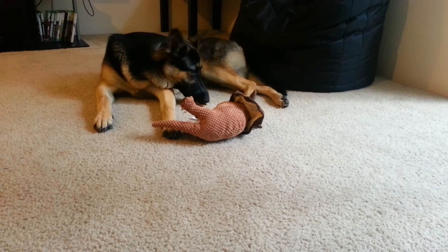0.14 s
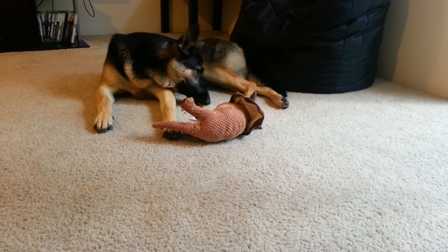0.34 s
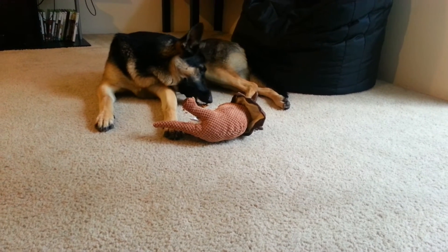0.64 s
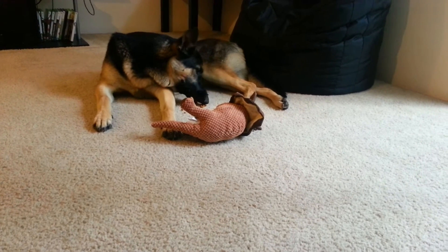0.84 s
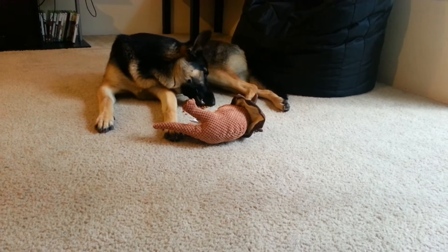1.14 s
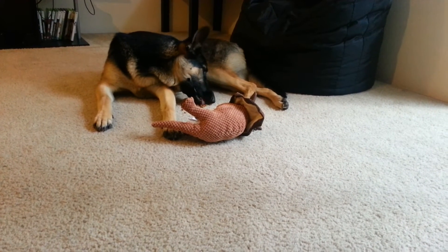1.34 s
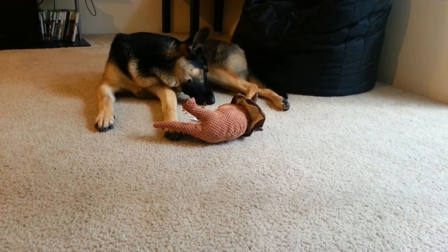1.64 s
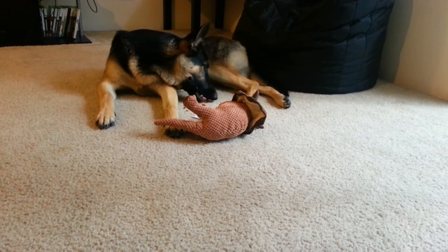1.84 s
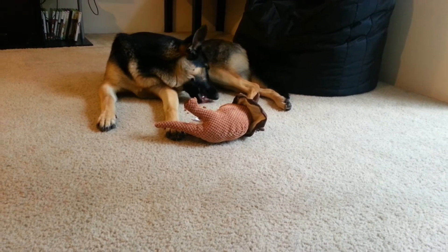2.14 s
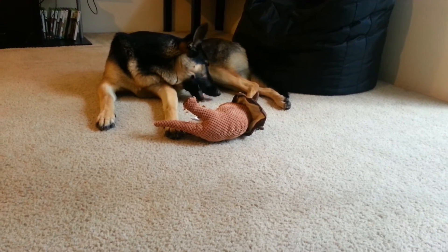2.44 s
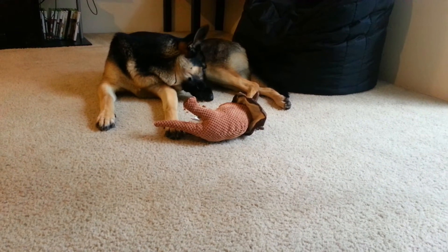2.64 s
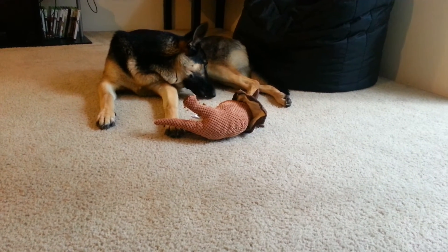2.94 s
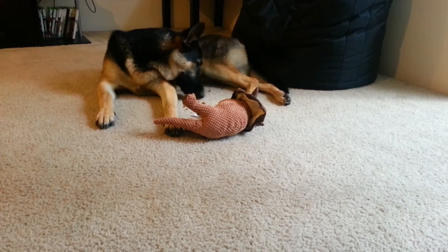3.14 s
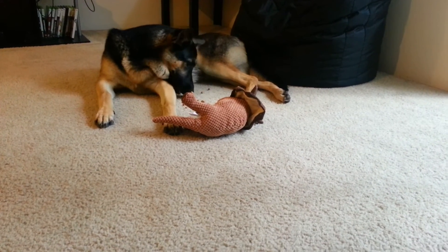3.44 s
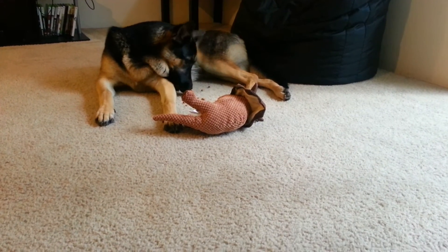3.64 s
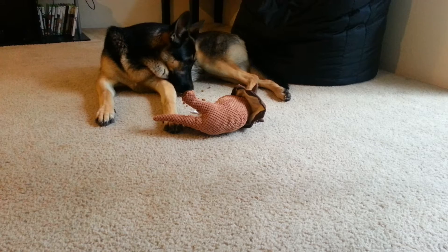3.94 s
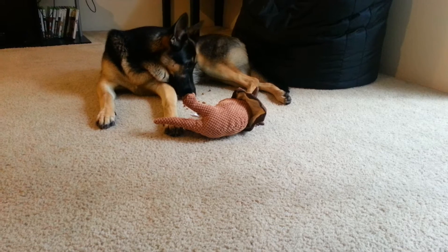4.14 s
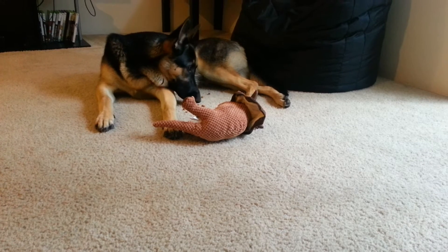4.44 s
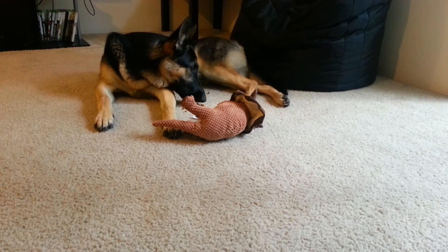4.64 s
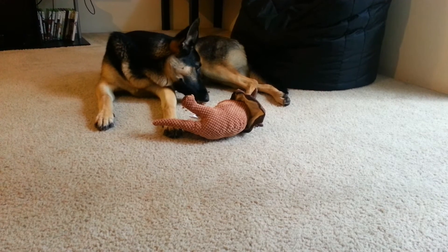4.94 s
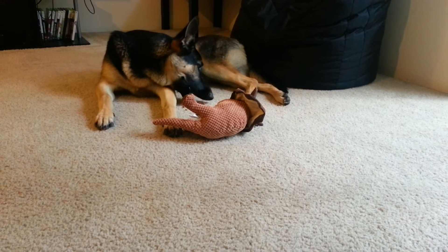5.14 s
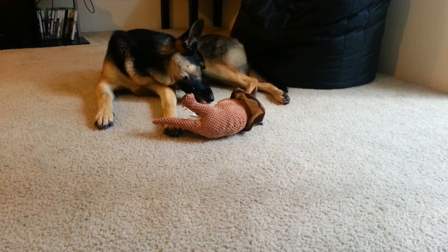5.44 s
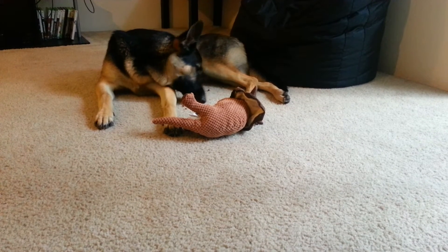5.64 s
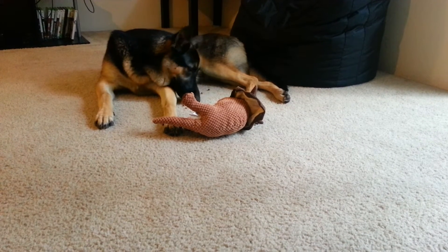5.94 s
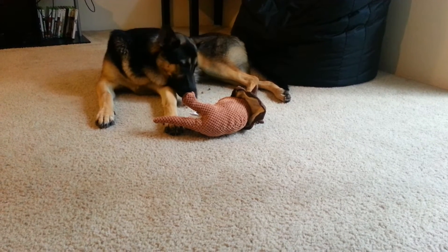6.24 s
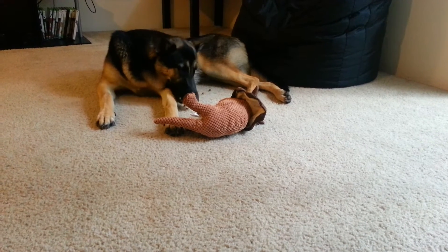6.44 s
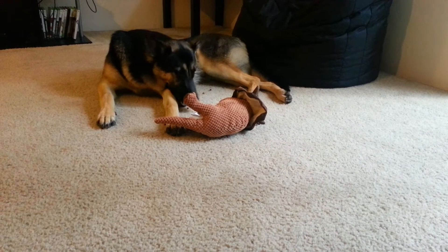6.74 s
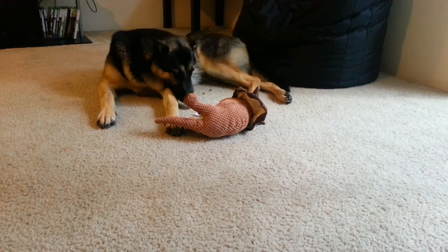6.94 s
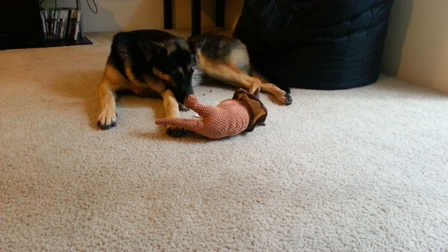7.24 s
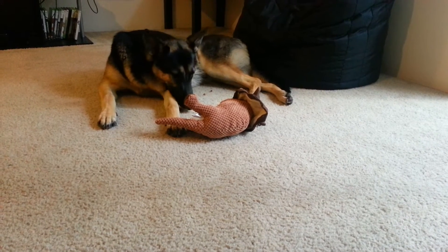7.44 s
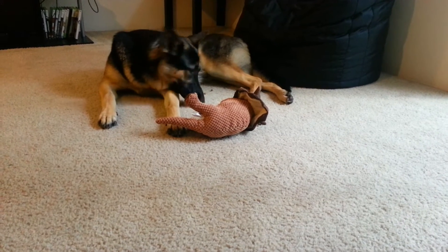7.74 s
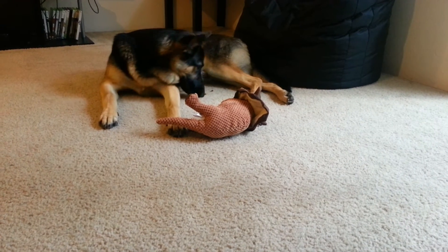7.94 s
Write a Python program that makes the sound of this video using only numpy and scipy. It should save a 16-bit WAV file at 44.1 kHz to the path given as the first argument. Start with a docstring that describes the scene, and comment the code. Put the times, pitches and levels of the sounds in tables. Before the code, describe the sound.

Bright, brittle crunching from a chewing dog bursts loudest around two seconds, then thins to scattered clicks and soft knocks as the room hum drops.

```python
"""In a carpeted room, a dog gnaws something dry and brittle: sharp cracks over dense crackle, and soft knocks.
Cracks are ringing noise snaps; the crackle is thousands of tiny ringing bursts over rubbing noise.
A low machine hum and rumble, made of filtered noise, fill the room and fade after five seconds.
A noise suppressor lets the background hiss swell when the gnawing is loud enough.
A faint thin sine whine sits near 10 kHz in the first half."""
import sys
import numpy as np
from scipy import signal
from scipy.fft import rfft, irfft, next_fast_len
from scipy.io import wavfile
from scipy.ndimage import uniform_filter1d

SR = 44100
rng = np.random.default_rng(int(sys.argv[2]) if len(sys.argv) > 2 else 0)


def waveform_to_disk(signal):
    """Save audio, clipped to [-1, 1], as 16-bit WAV at the path in sys.argv[1]."""
    frames = np.transpose(np.atleast_2d(signal))
    scaled = np.clip(frames, -1, 1) * 32767
    samples = np.round(scaled).astype(np.int16)
    wavfile.write(sys.argv[1], SR, samples)


def boost_factor(decibels):
    """Convert a level in decibels to a linear amplitude factor."""
    exponent = np.asarray(decibels, float) / 20
    return 10 ** exponent


N = 356460   # length in samples


def in_time(rows):
    """Turn table columns into curves with one value per sample, by straight lines between rows."""
    seconds, *columns = np.transpose(rows)
    return [np.interp(np.arange(N) / SR, seconds, column) for column in columns]


def at_hz(points, hz):
    """Read a frequency table at any frequency, by straight lines on a log frequency axis."""
    table_hz, values = np.transpose(points)
    return np.interp(np.log(hz), np.log(table_hz), values)


def rms_one(x):
    """Scale to an rms (average strength) of 1."""
    return x / np.sqrt(np.mean(x ** 2) + 1e-20)


def resonance(x, hz, width_hz):
    """Ring at one pitch: a two-pole filter with a gain of about 1 at its top."""
    r = np.exp(-np.pi * width_hz / SR)
    feedback = [1, -2 * r * np.cos(2 * np.pi * hz / SR), r * r]
    return signal.lfilter([(1 - r * r) / 2, 0, (r * r - 1) / 2], feedback, x)


def flicker(rate_hz=11.0):
    """Slow random wander with a spread of 1: white noise smoothed twice."""
    r = np.exp(-2 * np.pi * rate_hz / SR)
    wander = signal.lfilter([1], [1, -2 * r, r * r], rng.standard_normal(N + SR))
    return rms_one(wander[SR:])   # leave out the first second, while the filter settles


# How alike the two microphones hear. Each row: frequency in Hz, likeness (1 = the same, 0 = unrelated).
ALIKENESS = [(60, .85), (200, 0.72), (630, 0.77), (1400, 0.22), (3000, 0.32), (6700, 0.05)]
# How sound leans to one side. Each row: frequency in Hz, left level minus right level in dB.
SIDE_LEAN = [(60, 0), (300, 3.5), (1300, 3.5), (2400, 2.16), (4300, 3.5), (8000, -7), (14000, 5)]


def coloured(mid_side, spectrum):
    """Colour a shared and a side noise by a spectrum and spread them over two microphones; rms 1."""
    size = next_fast_len(N)
    hz = np.maximum(np.arange(size // 2 + 1) * SR / size, 1)
    alike = np.clip(at_hz(ALIKENESS, hz), -1, 1)
    mid, side = rfft(mid_side, size) * boost_factor(at_hz(spectrum, hz))
    pair = np.sqrt(1 + alike) * mid + np.sqrt(1 - alike) * side * [[1], [-1]]
    lean = boost_factor(at_hz(SIDE_LEAN, hz) / 2 * [[1], [-1]])
    return rms_one(irfft(pair * lean, size)[:, :N])


# Single sharp cracks. Each row: start in seconds, peak of the left-right average in dB before the
# treble is cut, pitch in Hz.
CRACK_EVENTS = [(0.4446, -22.5, 5760), (0.48, -37, 2830), (0.599, -21, 7810), (0.6082, -22, 6240),
                (0.7065, -26, 7100), (0.7231, -15.5, 7210), (0.7384, -24.5, 7000), (0.7565, -21, 7050),
                (0.7707, -13.5, 4440), (0.7956, -13, 6800), (0.828, -25, 6700), (0.8994, -41, 2160),
                (0.9855, -40, 6900), (1.545, -19, 6900), (1.7759, -31, 8500), (1.8115, -17.5, 7160),
                (1.8897, -17, 5950), (1.897, -12.5, 4470), (1.9895, -7, 6980), (2.0045, -10.5, 4856),
                (2.0127, -9.5, 7170), (2.0274, -5.5, 6910), (2.045, -9, 6820), (2.0646, -7, 7080),
                (2.07, -9, 7400), (2.0771, -6, 7040), (2.1156, -7.5, 7005), (2.149, -4, 5420),
                (2.173, -12, 6800), (2.228, -19, 4860), (2.2635, -18, 4396), (2.2794, -21, 6570),
                (2.2987, -23, 6860), (2.3044, -17, 6640), (2.3218, -19, 6200), (2.375, -25, 7300),
                (2.395, -33.5, 3490), (2.4144, -21.5, 7020), (2.4513, -16, 4500), (2.4635, -21.5, 4830),
                (2.48, -25, 6940), (2.5024, -20, 6700), (2.5235, -19.5, 7280), (2.5456, -23.5, 7300),
                (2.5597, -14.5, 7010), (2.59, -18.5, 6480), (2.5955, -21.5, 5400), (2.628, -24.5, 6700),
                (2.831, -23, 6470), (3.0931, -27.5, 7340), (3.2094, -37.5, 6240), (3.801, -34, 7830),
                (3.9499, -32, 7250), (5.0858, -44.5, 6850), (5.3023, -34, 6000), (5.322, -41, 5800),
                (5.345, -40, 5900), (5.3716, -40, 5590), (5.389, -40, 5380), (5.6456, -43.5, 7250),
                (5.9333, -33, 7140), (6.0784, -35, 6600), (6.238, -46, 6800), (6.5936, -29.5, 6530),
                (6.7366, -36, 3770), (6.794, -44, 7000), (6.8584, -24, 3840), (7.2658, -33.5, 4880),
                (8.0651, -32, 6960)]


def cracks(rise_s=.0003, snap_s=.00057, tail_s=.006, tail_db=-20, q=4.0, port_hz=7100, body_db=-15.5):
    """A snap and short tail of noise, ringing at its own pitch and at the microphone ports."""
    size = 2048
    out, t = np.zeros((2, N + size)), np.arange(size) / SR
    decay = np.exp(-t / snap_s) + boost_factor(tail_db) * np.exp(-t / tail_s)
    shape = (1 - np.exp(-t / rise_s)) * decay
    port_gain = boost_factor([[-14.0], [-1.5]])   # left, right
    body_band = signal.butter(3, [1100, 5000], "band", fs=SR, output="sos")
    draws = rng.standard_normal((len(CRACK_EVENTS), 3, size))
    for (s, db, hz), noise in zip(CRACK_EVENTS, draws):
        burst = shape * noise[1:]   # treble reaches the two microphones unalike
        body = signal.sosfilt(body_band, shape * (noise[0] + 0.23 * noise[1:]))   # mostly shared
        lean = boost_factor(at_hz(SIDE_LEAN, hz) / 2 * np.array([[1], [-1]]))
        own = resonance(burst, hz, hz / q) * lean
        port = port_gain * resonance(burst, port_hz, 600) * (hz / port_hz)
        ring = own + port + boost_factor(body_db) * body
        i = round(s * SR)
        out[:, i:i + size] += boost_factor(db) * ring / np.abs(ring.mean(axis=0)).max()
    treble_cut = signal.butter(4, 11500, fs=SR, output="sos")
    return signal.sosfilt(treble_cut, out[:, :N])


# Long chews, one list each. Each row: time in seconds, crackle level in dB.
LONG_CHEWS = [
    [(0.7, -48), (0.79, -33), (0.84, -44), (0.88, -65.5)],
    [(1.765, -73), (1.803, -35), (2.065, -19), (2.143, -35), (2.157, -29), (2.21, -41), (2.298, -42),
     (2.44, -60), (2.455, -47), (2.6, -44), (2.72, -59)],
    [(5.15, -74), (5.162, -60), (5.216, -57.5), (5.28, -63), (5.33, -55), (5.398, -57), (5.43, -75.5)],
]
# Short bites. Each row: start in seconds, crackle peak in dB, time in seconds to fade by 20 dB.
SHORT_BITES = [(0.005, -46, .04), (.32, -62, .15), (.444, -52, .1), (.599, -39, .09), (.934, -60, .3),
               (1.546, -51, .1), (2.832, -56, .08), (3.092, -50, .06), (3.21, -62, .1), (2.94, -63, .1),
               (3.59, -64, .1), (3.802, -54, .055), (4.02, -63, .06), (3.954, -57, .07), (4.288, -61, .1),
               (5.084, -62, .04), (5.6, -58, .14), (5.932, -58, .09), (6.078, -63, .1), (6.17, -63, .1),
               (6.23, -64, .05), (6.356, -60, .06), (6.522, -59, .07), (6.591, -51.5, .07), (6.72, -58, .1),
               (6.74, -51, .11), (6.856, -45, .05), (6.975, -59, .06), (7.268, -45, .055), (7.64, -58, .06),
               (8.03, -63, .1), (8.065, -55, .04)]


def chews(rise_db_per_s=2800, longest_s=.13):
    """Loudness of the crackle: long chews follow their rows, bites jump up and fade evenly."""
    t, db = np.arange(N) / SR, np.full(N, -120.)   # as good as silent in between
    for rows in LONG_CHEWS:
        db = np.maximum(db, np.interp(t, *np.transpose(rows), left=-120, right=-120))
    for s, peak_db, fade_s in SHORT_BITES:
        near = slice(max(round((s - .1) * SR), 0), round((s + longest_s) * SR))
        late = t[near] - s
        bite_db = peak_db + np.minimum(rise_db_per_s * late, -20 * late / fade_s)
        db[near] = np.maximum(db[near], bite_db)
    return uniform_filter1d(boost_factor(db), size=200)


# Colour of the crackle. Each row: frequency in Hz, relative level in dB per Hz.
CRACKLE_COLOUR = [(500, -45.5), (900, -23), (1310, -7), (1680, -23), (2360, -7.5), (2990, -15),
                  (4460, -3.5), (6060, -4.5), (7100, 0.5), (7940, -9), (11400, -17.5), (12600, -25.5),
                  (14500, -40.5)]


def crackle(per_s=2000, spread_db=3.2, burst_s=.0008, q=3.0, rub=.8):
    """Tiny fractures at random: noise bursts, each ringing at one of eight pitches, over rubbing noise."""
    hits = rng.random(N) < per_s / SR
    sizes = boost_factor(spread_db * np.minimum(rng.exponential(1, N), 4)) * hits
    r = np.exp(-1 / (burst_s * SR))
    dealt = rng.integers(0, 8, N)   # which pitch each fracture gets
    noise = rng.standard_normal((2, N))
    grains = 0
    for k, hz in enumerate(np.geomspace(1200, 12000, 8)):
        envelope = signal.lfilter([1], [1, -r], sizes * (dealt == k) + 1e-18)
        grains = grains + resonance(envelope * noise, hz, hz / q)
    rubbing = rub * rng.standard_normal((2, N))
    return chews() * coloured(rms_one(grains) + rubbing, CRACKLE_COLOUR)


# Dull knocks. Each row: start in seconds, peak in dB before the lean to the left, pitch in Hz.
KNOCK_EVENTS = [(.71, -40.5, 706), (1.93, -40.5, 397), (2.64, -36.5, 443), (5.59, -53, 644),
                (6.17, -47.5, 400), (6.6, -53, 600), (7.38, -57, 400)]


def knocks(cycles=5.5, q=1.3):
    """Soft swells of low noise, some cycles long, through two broad resonances at the same pitch."""
    size = 8192
    out, t = np.zeros(N + size), np.arange(size) / SR
    draws = rng.standard_normal((len(KNOCK_EVENTS), size))
    for (s, db, hz), noise in zip(KNOCK_EVENTS, draws):
        rung = resonance(resonance(noise, hz, hz / q), hz, hz / q)
        thud = rung * t * np.exp(-t * hz / cycles)
        i = round(s * SR)
        out[i:i + size] += boost_factor(db) * thud / np.abs(thud).max()
    return out[:N] * boost_factor([[1.3], [-1.3]])   # left up, right down, in dB


def whine(hz=10010, peak_db=-78.5, end_s=4.07):
    """A steady faint sine tone that stops with a 28 ms fade."""
    t = np.arange(N) / SR
    return boost_factor(peak_db) * np.sin(2 * np.pi * hz * t) * np.clip((end_s - t) / 0.028, 0, 1)


# How far the hiss is held down between chews. Each row: time in seconds, level in dB before hiss() raises it.
SHUT_LEVEL = [(0.0, -76), (0.9, -74), (2.77, -75), (6.93, -84), (8.08, -82)]


def suppressor(sound, open_db=-69, threshold_db=-66, knee_db=8.0, hold_s=.019):
    """Noise suppressor: opens while the dog is loud; returns the shut level and the rise on opening, in dB."""
    width = round(hold_s * SR)
    power = uniform_filter1d((sound ** 2).mean(axis=0), width, origin=width // 3)
    opening = np.clip((10 * np.log10(power + 1e-12) - threshold_db) / knee_db, 0, 1)
    shut_db = in_time(SHUT_LEVEL)[0]
    return shut_db, opening * (open_db - shut_db)   # held down deeper, it jumps more


# Colour of the hiss. Each row: frequency in Hz, relative level in dB per Hz.
HISS_COLOUR = [(410, -23), (700, -9), (2670, -16), (6160, -15), (7180, -11.5), (8500, -19), (13800, -20),
               (14400, -17), (14800, -44)]


def hiss(shut_db, open_by_db, raise_db=12.5, flicker_db=1.5):
    """Coloured noise whose level follows the suppressor and flickers at random."""
    level_db = shut_db + raise_db + open_by_db + flicker_db * flicker()
    return boost_factor(level_db) * coloured(rng.standard_normal((2, N)), HISS_COLOUR)


# Brief swells of the low background. Each row: middle in seconds, rise of the deep hum in dB.
SWELL_EVENTS = [(5.75, 14), (6.34, 8), (6.46, 9), (6.61, 12), (6.77, 6), (6.88, 11), (7.23, 13), (7.3, 10),
                (7.39, 6), (7.55, 6), (7.97, 8)]


def swells(width_s=.04):
    """Bell-shaped rises in dB."""
    t = np.arange(N) / SR
    return sum(db * np.exp(-((t - s) / width_s) ** 2) for s, db in SWELL_EVENTS)


# Base levels of the lows, before swells and wavering. Each row: time in seconds, rumble setting in dB
# (rumble() halves its broad part), deep hum in dB.
LOW_LEVELS = [(0.0, -48, -57), (0.38, -43, -57), (0.76, -43, -60), (1.0, -45, -53), (1.6, -42.5, -56),
              (2.0, -41.5, -57), (2.9, -42.5, -54), (3.6, -44.5, -55), (4.35, -46, -55), (4.46, -57, -66),
              (4.6, -47, -51), (4.86, -51.5, -56), (5.06, -57, -67), (5.26, -55, -66), (5.55, -62, -68),
              (7.13, -62, -71), (7.6, -61, -69), (8.08, -56, -66)]


def low_levels(open_by_db, rumble_share=.35, deep_share=.3, lag_s=.04):
    """Rumble and deep hum levels in dB: they swell, waver, and follow the suppressor slowly and in part."""
    slow_db = uniform_filter1d(open_by_db, round(lag_s * SR))
    swell_db = swells()
    rumble_db, deep_db = in_time(LOW_LEVELS)
    rumble_db = rumble_db + rumble_share * slow_db + .5 * swell_db + 1.4 * flicker(rate_hz=7.0)
    deep_db = deep_db + deep_share * slow_db + swell_db + 2.5 * flicker(rate_hz=5.0)
    return rumble_db, deep_db


# Colour of the broad rumble. Each row: frequency in Hz, relative level in dB per Hz.
RUMBLE_COLOUR = [(15, -56.5), (25, -22), (71, -12.5), (102, -18), (155, -6.5), (209, -12.5), (270, -6),
                 (326, -13), (1380, -25), (2350, -37.5), (4000, -44.5), (5200, -72.5), (8800, -120)]
# Room resonances the hum excites. Each row: pitch in Hz, width in Hz of each of two passes, relative level in dB.
HUM_BANDS = [(208.04, 13, -4.5), (295.1, 20, -21)]
# Hum against rumble. Each row: time in seconds, level added to the hum bands in dB.
HUM_AGAINST_RUMBLE = [(0, -2), (2.9, -2), (3.3, 2), (4.8, 1), (5.3, -3.5)]


def rumble(level_db, deep_db, deep_hz=107, deep_width_hz=22):
    """Broad low noise plus narrow wavering hum bands; the deepest band has its own level."""
    broad = coloured(rng.standard_normal((2, N)), RUMBLE_COLOUR)
    white = rng.standard_normal(N)

    def band(hz, width_hz):
        """Noise through the same resonance twice, rms 1."""
        return rms_one(resonance(resonance(white, hz, width_hz), hz, width_hz))

    hum = sum(boost_factor(db) * band(hz, width_hz) for hz, width_hz, db in HUM_BANDS)
    hum_gain = boost_factor(level_db + in_time(HUM_AGAINST_RUMBLE)[0])
    tones = hum_gain * hum + boost_factor(deep_db) * band(deep_hz, deep_width_hz)
    return boost_factor(level_db) * .5 * broad + tones * boost_factor([[1.3], [-1.3]])   # tones lean left, in dB


def scene():
    """Gnawing over the room background; cracks and crackle together steer the suppressor."""
    dog = cracks() + crackle()
    shut_db, open_by_db = suppressor(dog)
    rumble_db, deep_db = low_levels(open_by_db)
    return dog + knocks() + whine() + hiss(shut_db, open_by_db) + rumble(rumble_db, deep_db)


def band_limit(x):
    """A steep low-pass at the top of the band."""
    return signal.sosfilt(signal.butter(12, 15300, fs=SR, output="sos"), x)


def record(dry):
    """Round off the peaks smoothly, then cut the top, 50 dB down from 16 kHz."""
    rounded = 1.2 * np.tanh(dry / 1.2)
    top_cut = signal.cheby2(8, 50, 16000, fs=SR, output="sos")
    mix = signal.sosfilt(top_cut, rounded)
    return band_limit(mix)


dry = scene()
out = record(dry)
waveform_to_disk(out)
```